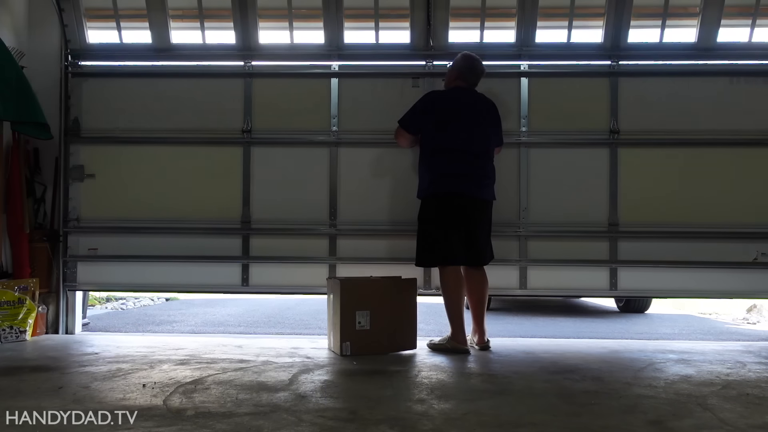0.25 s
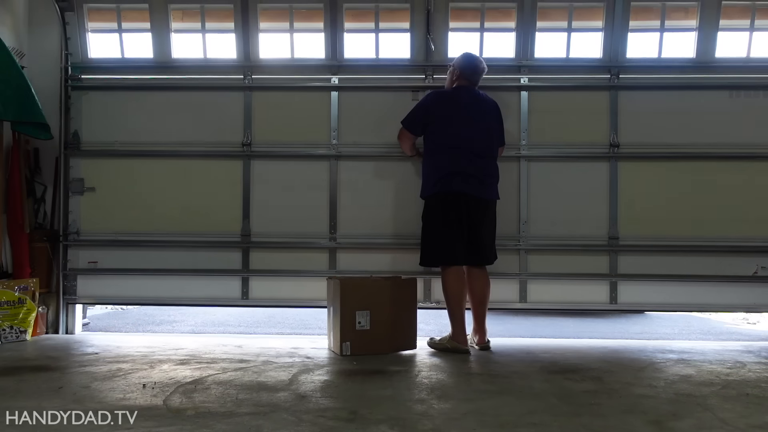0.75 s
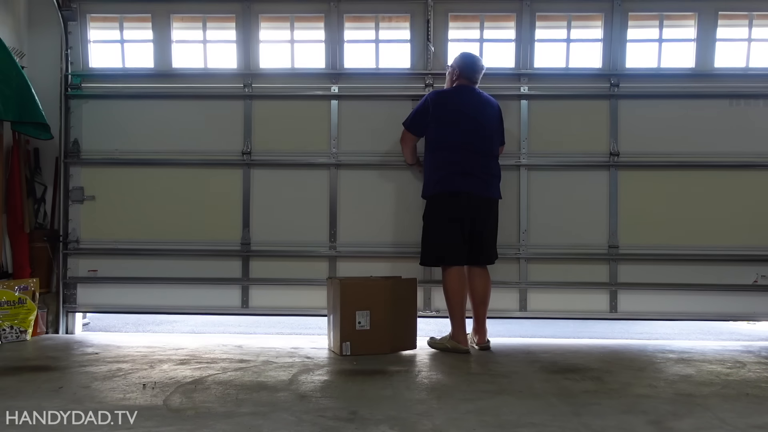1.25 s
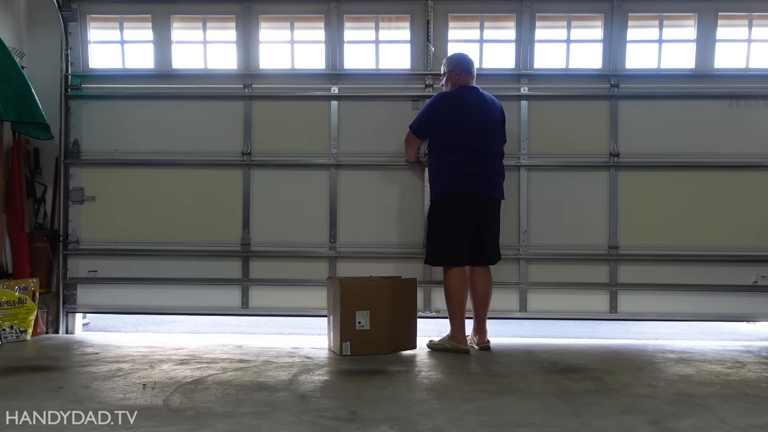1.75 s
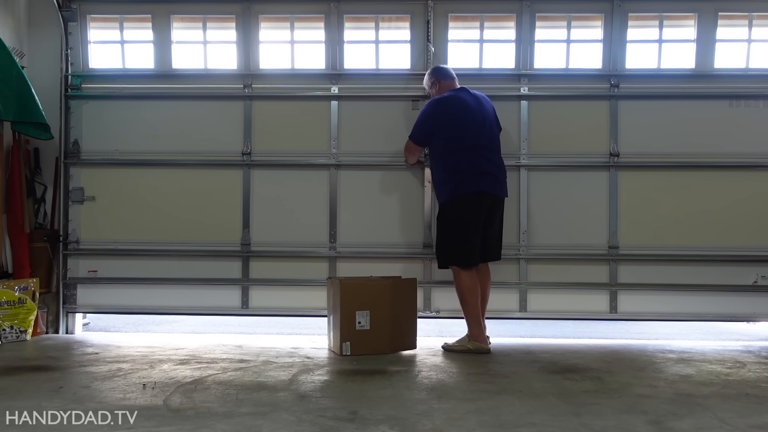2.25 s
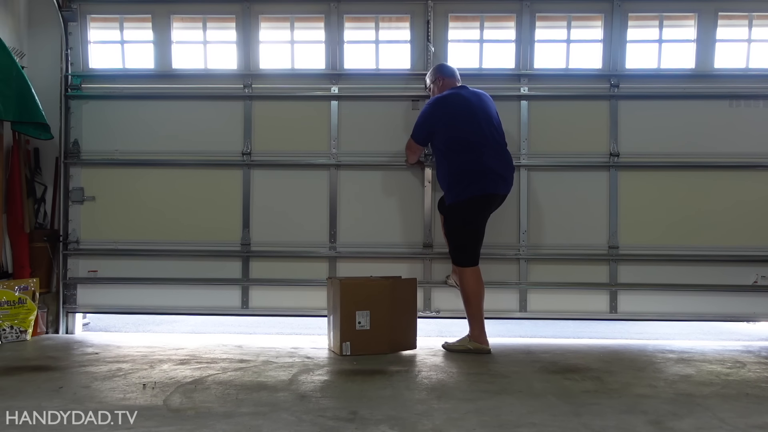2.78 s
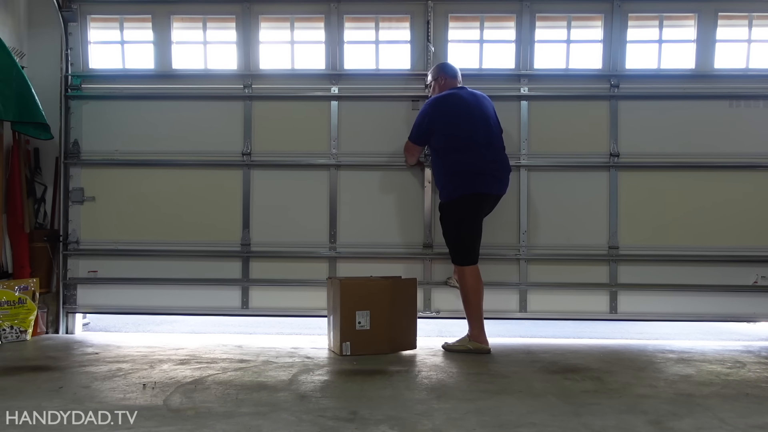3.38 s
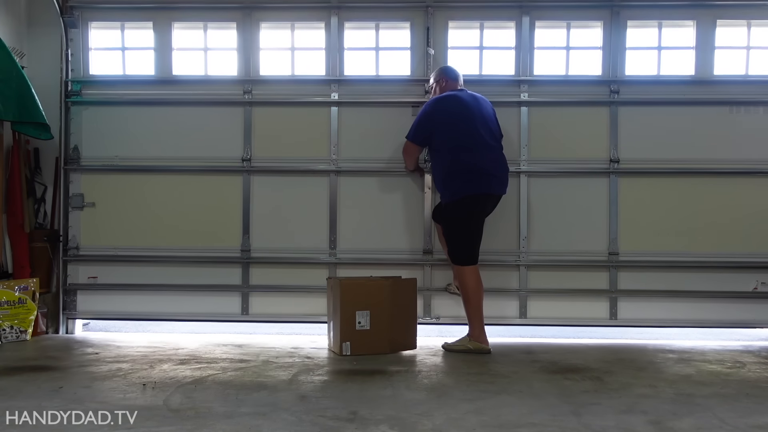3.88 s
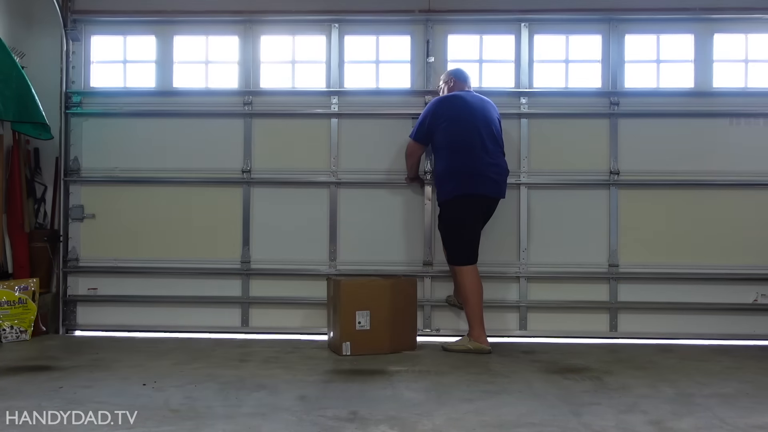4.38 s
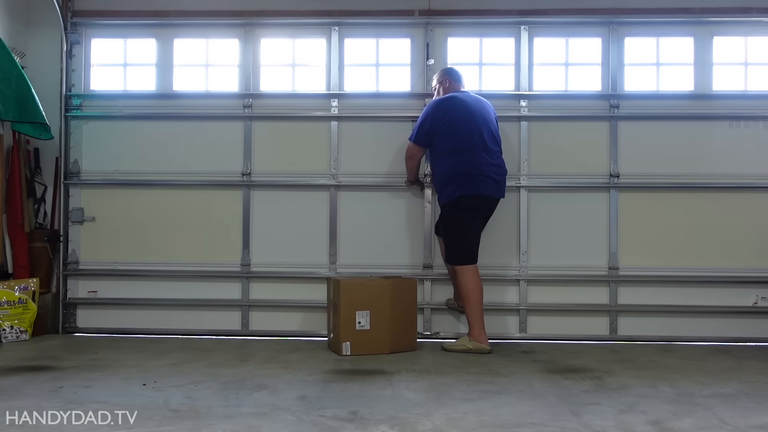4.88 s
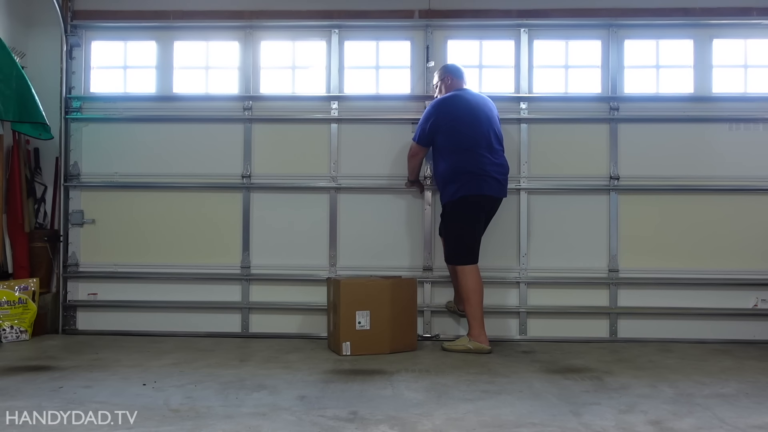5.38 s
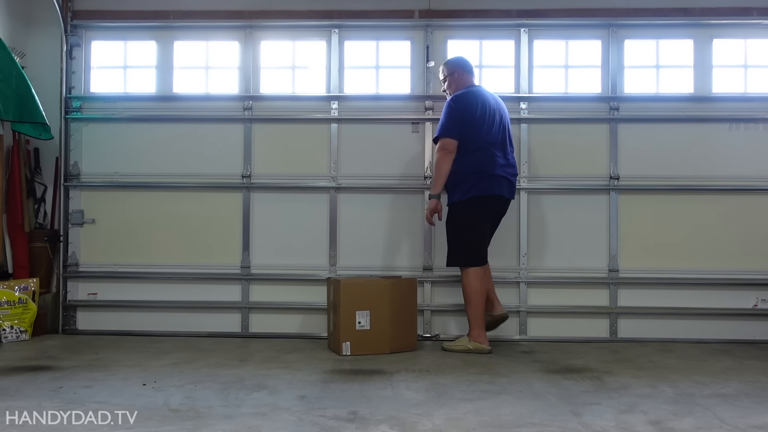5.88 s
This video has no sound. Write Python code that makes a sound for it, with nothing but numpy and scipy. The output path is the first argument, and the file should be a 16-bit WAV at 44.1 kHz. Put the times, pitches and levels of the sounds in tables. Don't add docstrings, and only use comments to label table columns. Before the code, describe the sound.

A steel sectional garage door grinds down in rough pushes, rollers rattling and groaning, then slams twice and rings out in a hard room.

```python
import sys
import numpy as np
from scipy import signal
from scipy.fft import rfft, irfft
from scipy.io import wavfile
from scipy.ndimage import uniform_filter1d

SR = 44100
rng = np.random.default_rng(int(sys.argv[2]) if len(sys.argv) > 2 else 0)


def linear_from_db(decibels):
    return 10 ** (np.asarray(decibels, float) / 20)


def put_to_file(sound):
    columns = np.atleast_2d(sound).T
    safe = np.clip(columns, -1, 1)
    whole_steps = np.round(safe * 32767)
    wavfile.write(sys.argv[1], SR, whole_steps.astype(np.int16))


N = 270774


def evened(x):
    return x / np.sqrt(np.mean(x ** 2) + 1e-20)


def smooth_noise(shape, size):
    once = uniform_filter1d(rng.standard_normal(shape), size=size)
    return evened(uniform_filter1d(once, size=size))


def read(points, hz):
    f, value = np.transpose(points)
    return np.interp(np.log(hz + 1), np.log(f + 1), value)


def closed(points, hz):
    return linear_from_db(read(points, hz)) * (hz > points[0][0]) * (hz < points[-1][0])


def add(mix, start_s, sound):
    part = mix[..., round(start_s * SR):][..., :sound.shape[-1]]
    part += sound[..., :part.shape[-1]]


# frequency in Hz, likeness 0-1.
LIKENESS = [(60, .999), (150, 0.99), (350, 0.97), (700, .94), (1650, 0.76), (4970, 0.78), (10000, 0.67),
            (15000, .55)]


def noise(gain, patchy_db, size=2048):
    hop = size // 4
    frames, hz = N // hop + 5, np.fft.rfftfreq(size, 1 / SR)
    a, b, c, d, patches = rng.standard_normal((frames, len(hz), 5), dtype=np.float32).T
    patches = uniform_filter1d(patches, size=5, axis=0)
    patches = evened(uniform_filter1d(patches, size=10, axis=1))
    same = read(LIKENESS, hz)[:, None]
    left = a + 1j * b
    right = same * left + np.sqrt(1 - same ** 2) * (c + 1j * d)
    z = np.array([left, right]) * gain(hz)[:, None] * linear_from_db(patchy_db * patches)
    return evened(signal.istft(z, nperseg=size, noverlap=size - hop)[1][:, :N])


# frequency in Hz, level in dB per Hz.
AIR_COLOUR = [(15, -84.5), (25, -50.5), (211, 0.5), (309, 8.5), (363, -3), (394, -2), (476, -14),
              (733, -14), (2610, -44.5), (9300, -34), (10900, -36.5), (14700, -36.5), (16000, -43)]


def still_air():
    return linear_from_db(-60.5) * noise(lambda hz: closed(AIR_COLOUR, hz), patchy_db=2.4)


# frequency in Hz, t60 in s.
ROOM_T60 = [(100, 0.98), (300, 0.86), (1000, 0.76), (3000, 0.7), (8000, 0.54), (12500, 0.13), (15500, 0.15)]


def garage(x):
    taps = rng.standard_normal((3, SR)) * np.minimum(np.arange(SR) / 500, 1)
    hz, t, z = signal.stft(taps, SR, nperseg=512)
    same = read(LIKENESS, hz)[:, None]
    z = np.sqrt(same) * z[0] + np.sqrt(1 - same) * z[1:]
    z = z * linear_from_db(-60 * t / read(ROOM_T60, hz)[:, None])
    tail = signal.istft(z, SR, nperseg=512)[1]
    return signal.fftconvolve(x[None], tail / np.linalg.norm(tail[0]), axes=1)[:, :N]


def walls(x, count=5):
    level_db, latest_s = -9.5, .012
    taps = np.zeros((2, 2048))
    place = rng.uniform(.15, 1, (2, count))
    sign = rng.choice([-1., 1.], (2, count))
    np.put_along_axis(taps, (place * latest_s * SR).astype(int), sign / np.sqrt(count), 1)
    bright = signal.sosfilt(signal.butter(1, 1500, "high", fs=SR, output="sos"), x)
    return linear_from_db(level_db) * signal.oaconvolve(bright[None], taps, axes=1)[:, :N]


# frequency in Hz, level in dB, t60 in s.
HUM_MODES = [(2630, -60, 1.3), (3190, -54, 1.3), (4560, -57, 1.2), (5990, -56, 1.2)]


def hum():
    start_s, beat_width_hz = 5.2, 45
    out, t = np.zeros(N), np.arange(SR) / SR
    bins = np.fft.rfftfreq(SR, 1 / SR)
    for hz, db, t60_s in HUM_MODES:
        resonance = 1 / (1 + (2 * (bins - hz) / beat_width_hz) ** 2)
        line = evened(irfft(rfft(rng.standard_normal(SR)) * resonance))
        add(out, start_s, linear_from_db(db - 60 * t / t60_s) * np.minimum(t / .1, 1) * line)
    return out


# (frequency in Hz, level in dB, t60 in s).
BRACKETS = [
    (1.21, -36.5, [(3020, -14, 0.27), (4220, 0, 0.21), (4880, 4.5, 0.26), (6650, -8, 0.66), (8000, -16.5, 0.18)]),
    (1.508, -48, [(675, 4.5, 0.64), (1184, 15.5, 1), (2870, 13.5, 0.38), (3180, 12, 0.41), (5530, -18, 0.95)]),
    (2.859, -60, [(2613, 2, 0.6), (3310, -6, .6), (5470, -13.5, 0.78)]),
    (3.379, -58.5, [(1620, 2, 0.5), (2220, 0.5, 0.5), (3050, 1, 0.44), (3300, -1, 0.4), (4300, -9, 0.37), (4150, -23, 0.63), (5800, -22, 0.22), (8000, -6, 0.43)]),
    (3.782, -29, [(2010, -14, 0.63), (2450, -19, 0.6), (2950, -20, .4), (3410, -11.5, .3), (4870, -7.5, 0.22), (7000, -27, 0.35), (8900, -16, 0.68), (9960, -16, 1)]),
    (4.155, -29.5, [(190.5, -5.5, 0.46), (344, -3.5, 0.55), (1703, -1, 0.58), (2200, 7.5, 0.31), (2640, 3.5, 0.38), (4530, -1.5, 0.94), (6500, -13, 0.91), (8400, -7, 0.5)]),
    (5.14, -34.5, [(328, -1.5, 0.63), (468, 2.5, 0.66), (1410, 6, .6)]),
    (3.158, -51, [(248, 2.5, .4), (369, -1.5, 0.42), (572, 0, .4), (870, 4, 0.31), (1050, -4, 0.33)]),
    (4.455, -43.5, [(3000, -2, 0.27), (4500, 1, 0.33), (6280, -3, .3)]),
    (5.3, -29.5, [(2630, -15, .6), (2830, -10.5, 0.73), (3230, -11, 1.8), (4511, -23, 1), (4600, -17.5, 0.48), (6020, -5, 0.91)]),
]
PANEL_BOOMS = [
    (4.1536, -25.5, [(705, 0, 0.17), (1140, 0, 0.27), (1510, -5, .3), (1950, 0.5, .3), (2430, 2, 0.35), (2900, -3, .3), (4600, 3, .12), (7940, 0, 0.092)]),
    (5.39, -39, [(555, -6, .3), (800, -6, 0.25), (1110, 0, 0.26)]),
    (6.033, -60, [(150, -3, .4), (290, 0.5, .4), (403, 5, .4), (547, 0, .4)]),
]
SMALL_PARTS = [
    (.544, -39, [(6040, 1, .3), (7950, -1, 0.43), (11000, 4, 0.32), (12100, 0, .35)]),
    (.27, -41, [(7300, -4, .5), (10300, 2, .4), (12100, 2, .6)]),
    (.43, -38, [(11000, 6, .3), (9000, -3, .3)]),
    (1.338, -41, [(3100, 6, .33), (5900, -4, 0.43)]),
    (1.575, -39.5, [(3100, 4, .3), (5880, -2.5, .4), (4000, -4, 0.42)]),
    (3.966, -36, [(6500, -4, .3), (8020, 0, 0.34), (9200, 2, 0.29)]),
    (4.012, -32, [(5030, 3.5, .4), (6600, -4, .4), (13000, -11, .3)]),
    (5.738, -62, [(6900, 0, .3)]),
    (6.03, -67, [(2590, -1, 0.14), (1500, 1.5, .3)]),
    (6.092, -69, [(7000, -1, .2), (8000, -0.5, .2), (5980, -3, .2)]),
]


def rings(size=22050):
    out, t = np.zeros(N), np.arange(size) / SR
    bins = np.fft.rfftfreq(size, 1 / SR)
    ends = np.minimum(t / .004, 1) * np.minimum((t[-1] - t) / .1, 1)
    for start_s, db, modes in BRACKETS + PANEL_BOOMS + SMALL_PARTS:
        for hz, mode_db, t60_s in modes:
            spread = np.exp(-((bins - hz) / (20 + .022 * hz)) ** 2)
            phase = np.exp(2j * np.pi * rng.random(len(bins)))
            cluster = evened(irfft(spread * phase, size)) / np.sqrt(2)
            fade = linear_from_db(-60 * t / np.clip(t60_s, .05, .6)) * ends
            add(out, start_s, linear_from_db(db + mode_db) * cluster * fade)
    return out


# time in seconds, share of drag 0-1.
TIGHTENING = [(.5, 0.03), (1.2, 0.54), (3.7, 0.76), (4.5, 0.63), (4.85, 0.65), (5.1, 0.91), (5.3, 0.97)]


def tightness(s):
    return np.interp(s, *np.transpose(TIGHTENING))


# start in seconds, length in s, slip rate in Hz, width in Hz, level in dB.
HAND_GROANS = [(0, 0.095, 701, 75, -30), (0.012, 0.065, 1403, 40, -22.5), (0.101, 0.19, 889, 67, -36),
               (.24, 0.32, 872.3, 14, -29.5), (.35, 0.18, 832.3, 31.5, -28.5), (0.544, 0.1, 700, 40, -36.5),
               (0.547, 0.62, 839, 70, -40), (0.662, 0.089, 1389, 20, -38), (0.711, 0.094, 1384, 5.9, -27.5),
               (0.6, 0.14, 699.5, 76, -36), (1.162, 0.078, 638, 17, -30), (1.165, 0.06, 1902, 43, -24),
               (1.164, 0.079, 2550, 38, -25.5), (1.189, 0.057, 1005, 66, -32.5),
               (1.19, 0.07, 1432, 54, -34), (1.195, 0.067, 2920, 49, -23.5), (1.331, 0.04, 3100, 98, -17),
               (.264, 0.18, 861, 85, -30), (0.828, 0.13, 693, 33, -41)]
FOOT_GROANS = [(3.385, 0.02, 1000, 21, -49.5), (3.695, 0.085, 585, 82, -38), (3.8, 0.22, 870, 120, -43),
               (4.01, 0.076, 1880, 150, -15), (4.212, 0.29, 104, 14, -49), (4.74, .37, 911, 140, -48.5),
               (4.79, 0.11, 365, 53, -43), (4.98, 0.083, 365, 50, -44), (4.85, 0.075, 2850, 200, -38.5),
               (4.99, 0.067, 2900, 150, -37), (4.88, 0.16, 880, 53, -44.5), (3.87, 0.1, 880, 87, -39),
               (5.06, 0.087, 910, 47, -31), (5.075, 0.067, 2776, 180, -21.5),
               (5.145, 0.148, 1030, 130, -31.5), (5.13, .15, 2650, 310, -16.5),
               (5.152, 0.18, 109, 13, -51.5), (5.205, 0.076, 550, 68, -29.5), (5.952, .19, 38, 26.4, -66.5),
               (.36, 0.14, 1670, 150, -21), (.015, 0.045, 2090, 90, -21), (.12, .12, 810, 25, -41.5),
               (5.17, 0.112, 600, 56, -28.5), (3.72, .07, 1170, 90, -45.5), (3.78, 0.054, 1410, 49, -43.5),
               (3.9, .12, 860, 38, -36), (.27, .12, 1700, 170, -28.5), (.28, .19, 2550, 180, -24.5)]
# frequency in Hz, level in dB.
GROAN_RESPONSE = [(200, -1.5), (620, -7), (860, 0), (1390, -0.5), (1700, -13), (2050, -15.5), (2600, -16),
                  (6000, -58)]


def groans(count=4):
    out = np.zeros(N)
    for start_s, length_s, hz, width_hz, db in HAND_GROANS + FOOT_GROANS:
        t = np.arange(round(length_s * SR)) / SR
        muffle_db = -13.5 * tightness(start_s) ** 2
        r = np.exp(-np.pi * width_hz / SR)
        drive = rng.standard_normal((len(t) + SR // 10, 2)) @ [1, 1j]
        slips = signal.lfilter([1], [1, -r], drive)
        slips = signal.lfilter([1], [1, -r], slips)[-len(t):]
        slips = slips / np.sqrt(np.mean(abs(slips) ** 2))
        slips = slips + 14 / width_hz
        slow = np.sin(2 * np.pi * (7 * t + rng.random()))
        fast = np.sin(2 * np.pi * (17 * t + rng.random()))
        drift = 1 + .013 * slow * fast
        turn = slips / abs(slips) * np.exp(2j * np.pi * hz * np.cumsum(drift) / SR)
        flicker_db = 2.5 * min(width_hz / 80, 1) * smooth_noise((count, len(t)), 250)
        lag = np.exp(2j * np.pi * rng.random(count))
        tone = np.zeros(len(t))
        for k in range(1, count + 1):
            level_db = read(GROAN_RESPONSE, k * hz) + (k - 1) * muffle_db + flicker_db[k - 1]
            tone += linear_from_db(level_db) * (lag[k - 1] * turn ** k).real
        swing = evened(abs(slips) ** .62) * np.sqrt(2)
        add(out, start_s, linear_from_db(db) * swing * tone * signal.windows.tukey(len(t), .35))
    return out


# frequency in Hz, width in Hz, dB over the broad colour.
DOOR_MODES = [(115.8, 2.9, 6), (246.8, 16.6, 21), (395, 62, 1), (586, 85, 9.5), (716, 10, 4),
              (870, 45, 0.5), (1040, 40, 3), (1099, 34, 3.5), (1225, 46, 5.5), (1340, 32, 3.5),
              (1400, 40, 2), (1658, 83, -2), (1810, 21, -4.5), (1990, 94, 2.5), (2580, 80, -4.5),
              (2900, 66, -1), (3100, 35, 1.5), (4160, 130, 3.5), (4900, 120, 1), (7300, 140, -6.5),
              (8130, 77, 1.5), (9300, 50, 1), (9500, 80, -1.5), (11000, 51, 9), (11700, 90, 4)]


def door_gain(hz):
    return linear_from_db(sum(db / (1 + (2 * (hz - f) / width_hz) ** 2) for f, width_hz, db in DOOR_MODES))


# start in seconds, blow in dB, hardness in dB, reach to upper panels in dB, rattle in s.
HAND_KNOCKS = [(.022, -20, -13.5, -15, 0.093), (0.118, -42, 7.5, -7, 0.11), (0.254, -31, -5, -17, 0.03),
               (0.264, -27.5, -5.5, -20, 0.1), (.397, -22, -6, -14, 0.076), (.543, -22.5, -7.5, -14, 0.058),
               (1.169, -24.5, -30, -16, 0.092), (1.211, -21, -4, -4, 0.054), (1.338, -34.5, -4, 2, .06),
               (1.507, -28, -0.5, -1, 0.02), (1.515, -23, -3, -3, 0.036), (1.573, -22, -7.5, -2.5, 0.034),
               (1.828, -37.5, -14.5, -7, 0.053), (1.98, -48.5, -5, -2, 0.073), (2.121, -52, 4, -7, 0.055),
               (2.132, -51, 3.5, -2, 0.05), (2.144, -49.5, 3.5, 2, 0.05), (2.157, -49.5, 3, 5, 0.044)]
FOOT_KNOCKS = [(2.858, -42.5, -33, -14, 0.16), (2.927, -43.5, -17, -16, 0.064),
               (3.16, -33, -40, -25, 0.029), (3.379, -38, -15, -11.5, 0.072), (3.675, -44, -16, -9, 0.069),
               (3.703, -33.5, -21, -12, 0.043), (3.73, -33, -24, -15, 0.043),
               (3.781, -24.5, -6.5, -7, 0.026), (3.965, -20.5, -1.5, -8, 0.05), (4.006, -27, -5, -8, .02),
               (4.012, -22.5, 2.5, 2, 0.058), (4.03, -27, 1.5, 0, .04), (4.1536, -14.5, -3.5, -2, 0.04),
               (4.157, -10, -6, -3, .007), (4.343, -35, 5.5, -16.5, .027), (4.453, -23, -14, -0.5, 0.023),
               (4.647, -41.5, -10, -25.5, 0.11), (4.739, -55, 0, -5, 0.0087), (4.855, -51, -3, -7, .06),
               (4.888, -41, -17, -27, .042), (4.996, -41.5, -9.5, -20, 0.078),
               (5.081, -28, -33, -16, 0.086), (5.126, -18, 5.5, -4.5, 0.098),
               (5.15, -13.5, -20.5, -2.5, 0.061), (5.175, -14.5, -12.5, -9, 0.046),
               (5.195, -23.5, -1.5, -10.5, 0.056), (5.217, -23, -3, -15, 0.053), (5.24, -25.5, 1, -12, .05),
               (5.751, -42, -12.5, -7.5, 0.039), (6.032, -46, -30, -14, .06)]
# frequency in Hz, offset in dB.
KNOCK_COLOUR = [
    [(60, -41), (130, -37.5), (400, -19), (650, -7.5), (1000, -5.5), (1500, -2)],
    [(2000, -5.5), (3100, -3), (3700, -8)],
    [(4500, -4), (6000, -4.5), (7500, -8.5)],
    [(9000, -3), (12500, -7), (16000, -22)],
]


def knocks(count=40, size=12288):
    out, t = np.zeros(N), np.arange(size) / SR
    hz = np.fft.rfftfreq(size, 1 / SR)
    door = door_gain(hz)
    for start_s, blow_db, hard_db, reach_db, rattle_s in HAND_KNOCKS + FOOT_KNOCKS:
        soft_db = min(hard_db, 0)
        grip = np.clip(tightness(start_s) / .19, 0, 1)
        sizzle_db = 4.5 + (-8 - 4.5) * grip
        levels_db = blow_db + np.array([0, reach_db, hard_db, hard_db + sizzle_db])
        place, strength = rng.random((count, 2)).T[:, :, None]
        centre_hz = 400 + 15000 * place ** 2.1
        width_hz = 25 + 0.0023 * centre_hz
        loose_db = (7 * strength ** 3 / (1 + ((hz - centre_hz) / width_hz) ** 2)).sum(0)
        points = [(f, level + db) for level, part in zip(levels_db, KNOCK_COLOUR) for f, db in part]
        broad_db = read(points, hz) - .33 * soft_db / (1 + (hz / 300) ** 4)
        crash = irfft(rfft(rng.standard_normal(size)) * linear_from_db(broad_db + loose_db) * door)
        contact = 0.86 * linear_from_db(.25 * soft_db) * np.exp(-t / 0.0065)
        rattle = np.exp(-(t / rattle_s) ** 1.39)
        rise_s = 0.0003 - .00012 * min(hard_db + 3, 0)
        add(out, start_s, crash * (rattle + contact) * np.minimum(t / rise_s, 1))
    return out


def judder(depth_db, size):
    return linear_from_db(depth_db * smooth_noise(N, size))


# time in seconds, panel load in dB, roller slip in dB over the load.
HAND_SHOVES = [
    [(0.0, -21, -11.5), (0.032, -37, 8), (0.1, -33.5, -9), (0.128, -30.5, 2), (0.23, -30, -10.5),
     (0.245, -38, -2)],
    [(0.26, -24, -5.5), (0.272, -29.5, -0.5), (0.4, -27.5, 0.5), (0.592, -29, -12), (0.746, -28, -15),
     (1.16, -31.5, -22)],
    [(1.2, -36, -26), (1.214, -28.5, -3.5), (1.494, -42.5, -27), (1.5, -36, -20.5)],
    [(1.51, -38.5, 0), (1.516, -40.5, -10), (1.954, -54.5, -15.5), (2.196, -66, 5), (2.45, -73.5, -1),
     (2.8, -71, -9)],
]
FOOT_SHOVES = [
    [(2.85, -63.5, -19), (2.892, -51, -13), (3.15, -52, -21), (3.17, -48.5, -26), (3.28, -55, -25),
     (3.362, -67, -18), (3.39, -57.5, -6), (3.66, -55, -20)],
    [(3.68, -46.5, -16), (3.768, -39.5, -28), (3.78, -41.5, -2), (3.934, -33.5, -10.5), (4.018, -21, -14),
     (4.15, -22.5, -14)],
    [(4.16, -14.5, -14.5), (4.298, -25.5, -8), (4.712, -47, -21), (4.8, -46.5, -12), (4.9, -42, -15.5),
     (5.0, -39, -21.5), (5.026, -40.5, -18.5), (5.07, -38, -30), (5.124, -33, -32)],
    [(5.13, -21.5, -20.5), (5.242, -25.5, 6.5), (5.652, -53.5, -5.5), (6.026, -64, -10),
     (6.034, -52, -24.5), (6.14, -60, -5.5)],
]
# time in seconds, level in dB.
FRAME_SWAY = [(0.0, -56), (0.03, -59.5), (0.79, -51.5), (1.11, -56.5), (1.55, -57.5), (2.21, -73.5),
              (2.79, -82), (2.91, -60.5), (3.56, -70), (3.73, -54), (3.95, -57.5), (4.07, -46),
              (4.55, -51.5), (4.58, -56.5), (5.11, -56.5), (5.21, -47), (5.59, -74.5), (6.14, -66)]
# frequency in Hz, level in dB per Hz; so in the five tables below.
RUMBLE_COLOUR = [(15, -59.5), (25, -43), (70, -18), (102, -3), (146, -4.5), (206, -9.5), (283, -5.5),
                 (355, -7), (441, -14), (488, -3.5), (520, -19), (680, -15), (1140, -120)]
PANEL_ROLLING = [(220, -61.5), (380, -41.5), (645, -4), (865, 10.5), (1090, -10), (1360, 2), (1500, -8.5),
                 (1680, -28.5), (2200, -42), (2860, -58), (4840, -120)]
PANEL_DRAGGING = [(220, -34.5), (380, 2), (440, -7), (549, -7.5), (595, -11.5), (645, 0.5), (980, 7),
                  (1200, -2.5), (2200, -32.5), (2860, -23), (4840, -120)]
BUZZ_COLOUR = [(940, -25), (1600, 8), (2370, -4), (2600, 4), (3180, -4), (3620, -6), (4400, -4.5),
               (5720, -18), (9680, -120)]
SCRAPE_SPINNING = [(2060, -27.5), (3500, 4.5), (3850, -4), (4150, -15.5), (4570, -9.5), (4990, -8.5),
                   (6200, -2), (6990, 8.5), (10900, 7.5), (16000, 0)]
SCRAPE_DRAGGING = [(2060, -55.5), (3500, -7.5), (4210, -25.5), (4430, -4.5), (4900, 12.5), (7550, 9.5),
                   (9980, -2.5), (11300, -12), (14200, -28), (16000, -55)]


def travel():
    time_s, *columns = np.vstack(HAND_SHOVES + FOOT_SHOVES).T
    t = np.arange(N) / SR
    load_db, slip_db = (np.interp(t, time_s, c) for c in columns)
    share = tightness(t)

    def colour(table, patchy_db):
        return noise(lambda hz: closed(table, hz) * door_gain(hz), patchy_db)

    def blend(free, tight):
        return np.sqrt(1 - share) * free + np.sqrt(share) * tight

    rumble_db = np.interp(t, *np.transpose(FRAME_SWAY)) + 5.5 + 0.086 * (load_db + 46.5)
    buzz_db = load_db - 15.5 + 0.43 * (slip_db + 9.5) + 6.5 * share
    scrape_db = load_db + slip_db - 4.5
    panel = blend(colour(PANEL_ROLLING, 1.2), colour(PANEL_DRAGGING, 3.2))
    scrape = blend(colour(SCRAPE_SPINNING, 1.0), colour(SCRAPE_DRAGGING, 1.6))
    scrape = scrape * judder(0.79, size=60)
    upper = linear_from_db(load_db - 5.0) * panel
    upper = upper + linear_from_db(buzz_db) * colour(BUZZ_COLOUR, 1.5)
    upper = upper + linear_from_db(scrape_db) * scrape
    return judder(1.0, size=500) * upper + linear_from_db(rumble_db) * colour(RUMBLE_COLOUR, 2.9)


def scene():
    blows = knocks()
    tones = groans() + rings() + hum()
    early = walls(blows + tones)
    tail = garage(linear_from_db(-1.5) * blows + linear_from_db(-9.0) * tones)
    return still_air() + tail + early + tones + blows + travel()


def low_pass(x):
    return signal.sosfilt(signal.butter(12, 16120, fs=SR, output="sos"), x)


def record(dry):
    edge = signal.firwin(255, 15750, window=("kaiser", 8), fs=SR)
    heard = signal.oaconvolve(dry, edge[None], "same")
    return low_pass(heard)


dry = scene()
out = record(dry)
put_to_file(out)
```